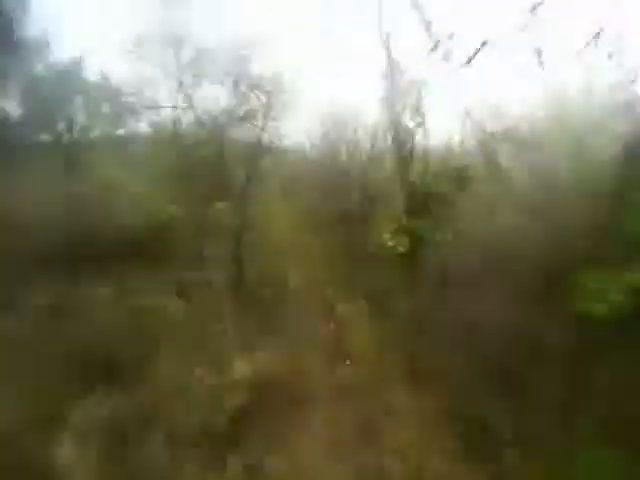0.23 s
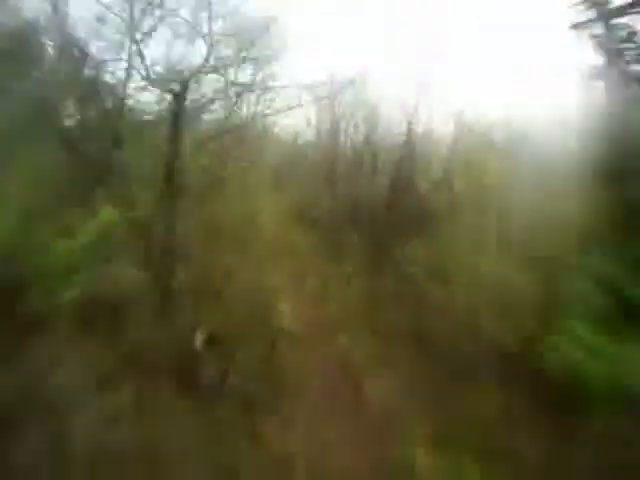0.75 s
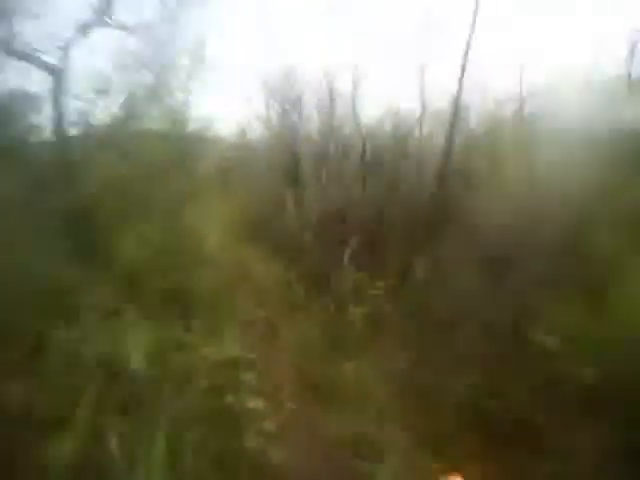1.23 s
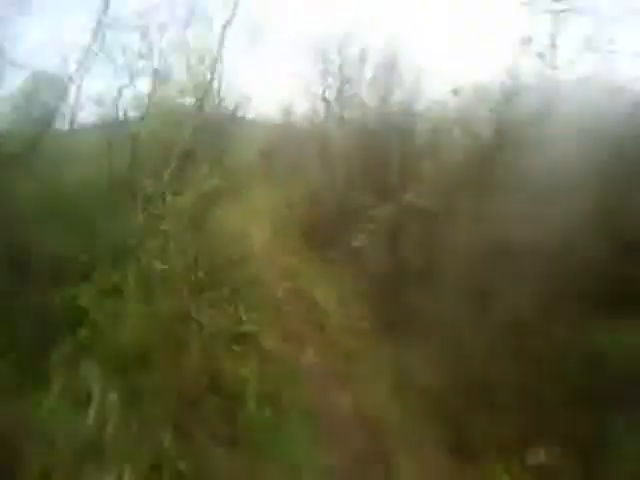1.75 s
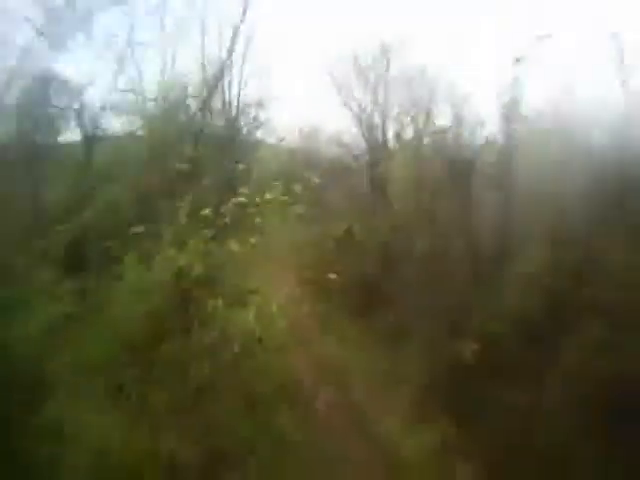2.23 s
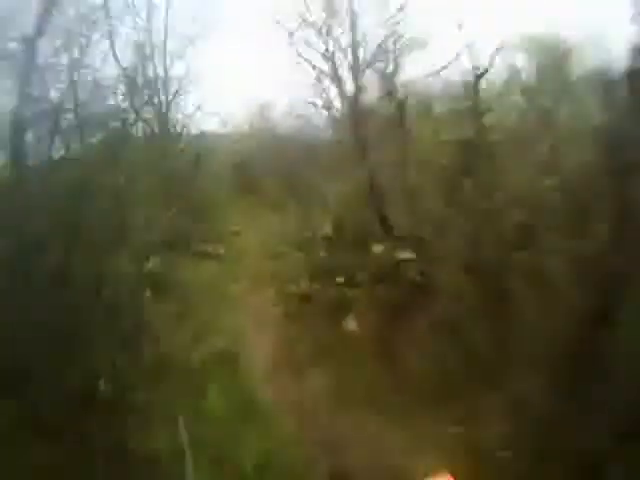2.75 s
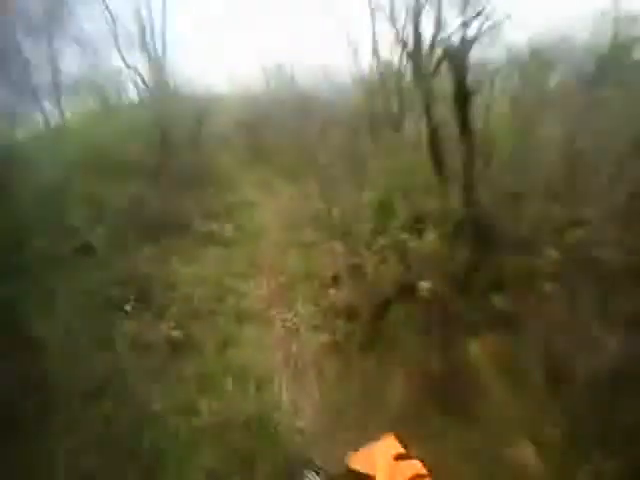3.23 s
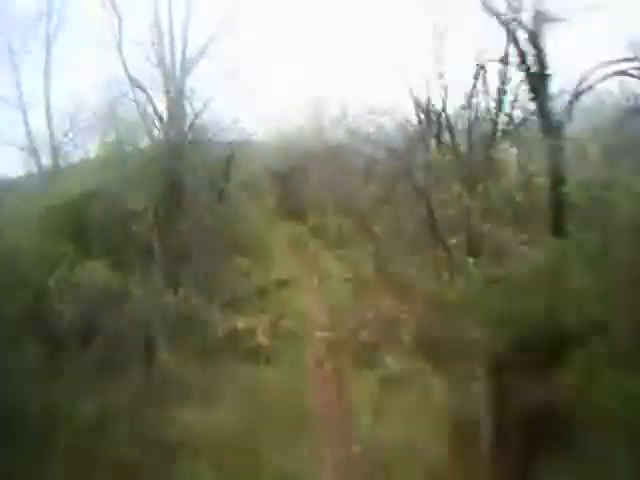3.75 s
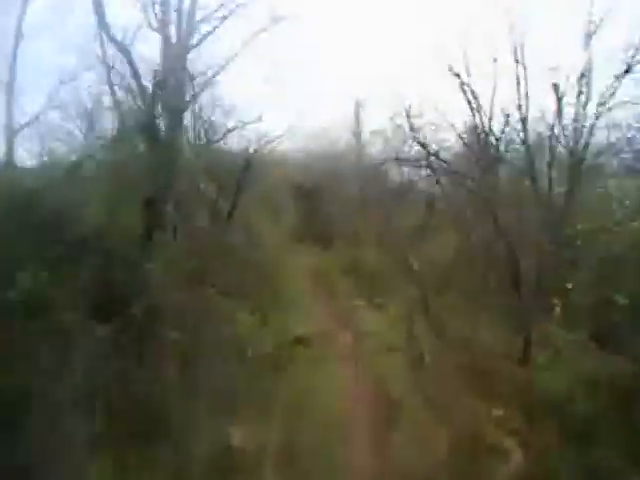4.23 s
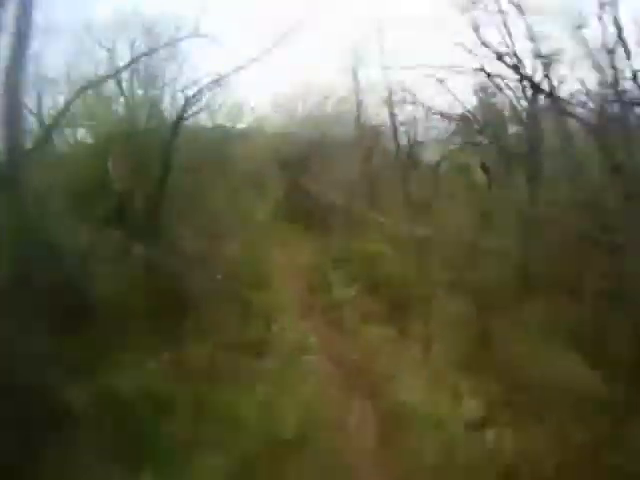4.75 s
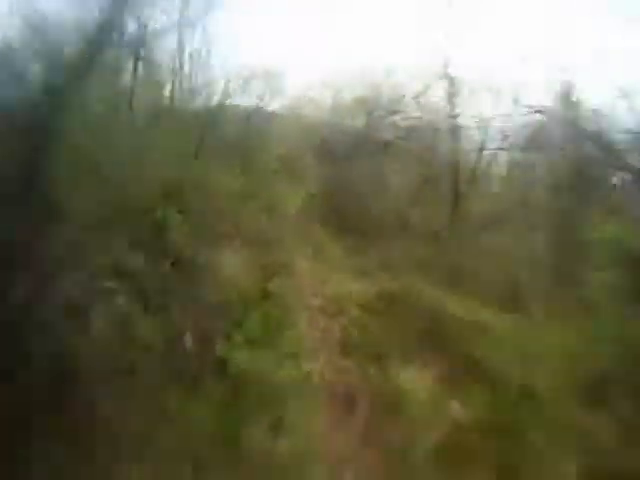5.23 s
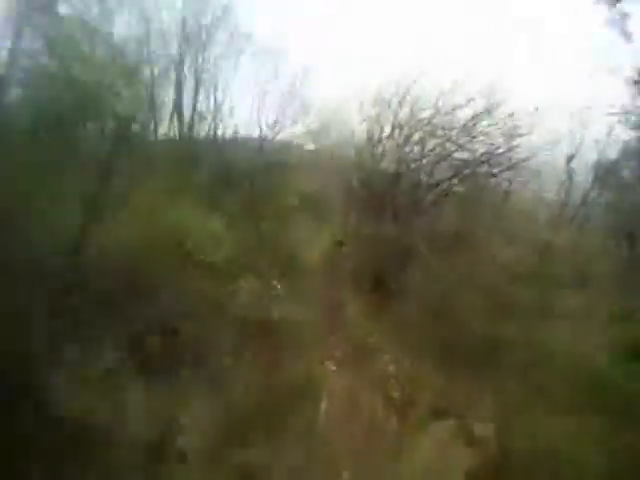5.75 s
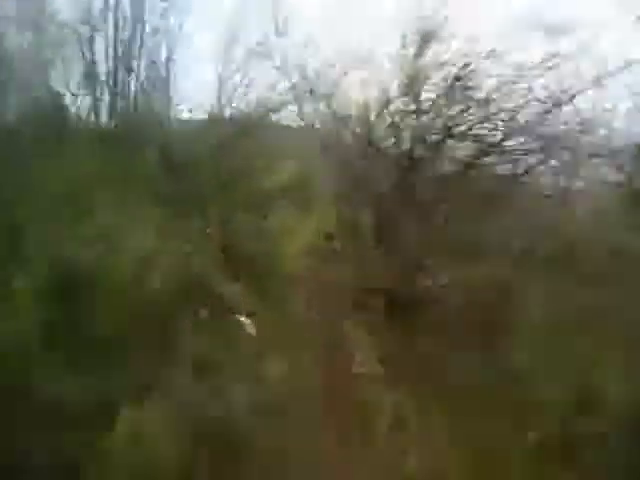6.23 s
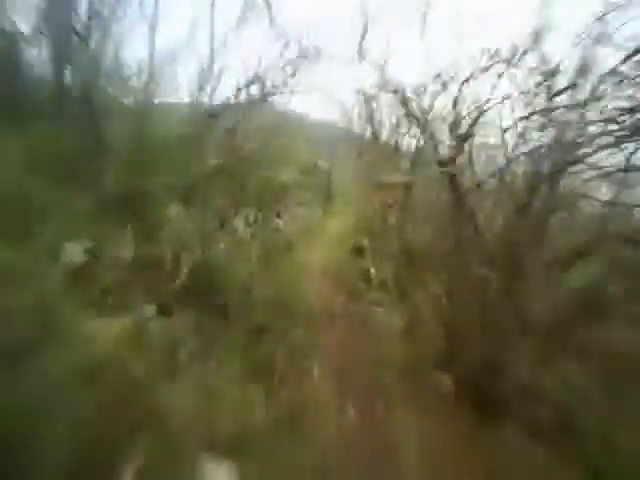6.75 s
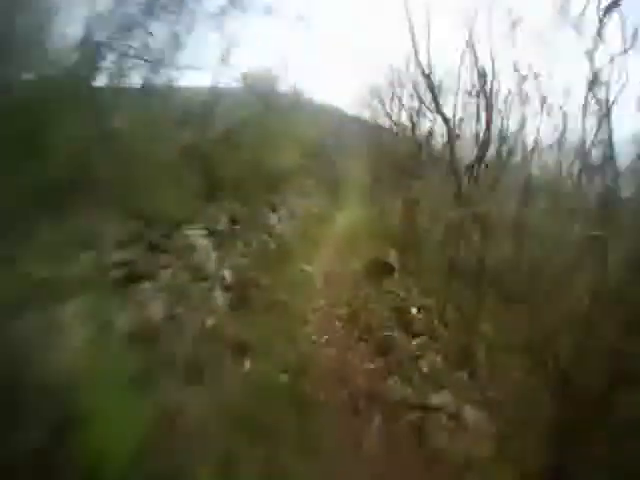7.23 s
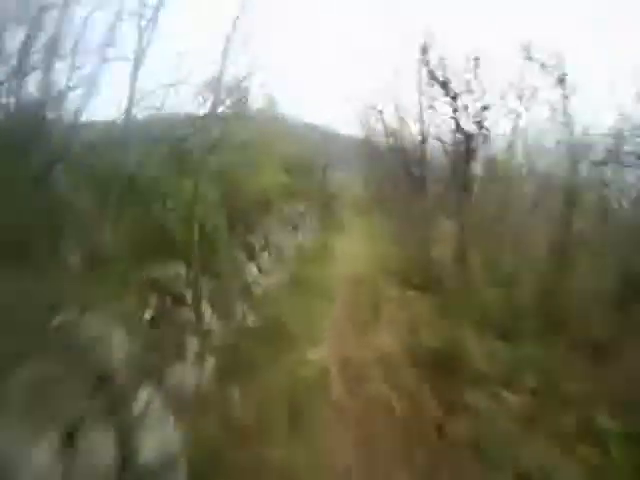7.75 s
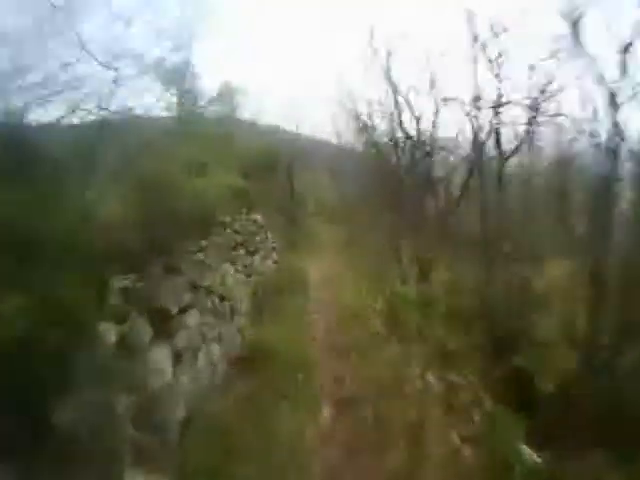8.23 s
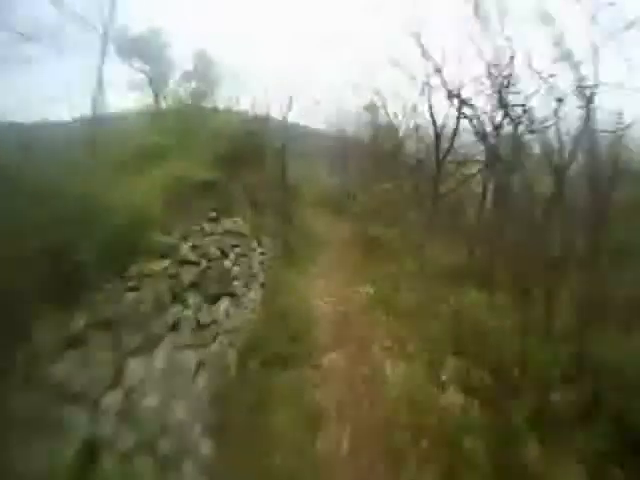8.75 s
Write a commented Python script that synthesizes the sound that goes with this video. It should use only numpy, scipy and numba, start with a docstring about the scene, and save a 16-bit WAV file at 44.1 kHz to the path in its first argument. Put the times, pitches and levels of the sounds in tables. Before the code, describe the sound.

Outdoor trail ride by bike, the microphone shut in a case on a springy mount, so everything is close, boxy and dull on top. Quiet throbbing rush and fine gravel crackle are interrupted by clusters of very loud, dry plastic clacks, metallic bracket knocks and low thumps. Small stones tick against the frame. Deep gusts buffet, and a soft ratchet buzz returns towards the end.

```python
"""Hard knocks, rattles and thuds of a mountain bike on a rocky trail, over wind, tyres and freewheel buzz.
We hear it from inside a closed case that rides along on a springy mount.
Blows are short noise chatter plus fading sines for the shell, bracket and mount.
Stones and wheel thuds are coloured noise bursts; wind is gusty noise over a steady rush whose lows pulse.
Tyres are random grains, the freewheel is a row of clicks, and a fast limiter flattens the worst blows."""
import sys
import numpy as np
from scipy import signal
from scipy.fft import rfft, irfft
from scipy.io import wavfile
from scipy.ndimage import uniform_filter1d, minimum_filter1d
from numba import njit

SR = 44100
rng = np.random.default_rng(int(sys.argv[2]) if len(sys.argv) > 2 else 0)


def master_out(mix):
    """Clip the mix to full scale and print it as 16-bit PCM to the path in sys.argv[1]."""
    frames = np.transpose(np.atleast_2d(mix))
    ceiling = np.clip(frames, -1, 1)
    pcm = np.round(ceiling * 32767).astype(np.int16)
    wavfile.write(sys.argv[1], SR, pcm)


N = 396459

# colour of the case chattering against its mount: [f/Hz, gain/dB]
CHATTER_COLOUR = [(100, -1.5), (300, 4.5), (480, 1), (780, 7), (1150, 2.5), (1650, 2), (2100, 3.5),
                  (2700, 4), (3300, -1), (4000, -6), (5000, -39.5)]
# patches of loose gravel: [middle t/s, half length/s, level/dB]
GRAVEL_PATCHES = [(1.35, .2, -55.5), (1.81, .07, -53.5), (2.9, 0.5, -57), (7.7, 1.2, -61.5)]


def knocks():
    """Big rocks slam the case against its mount: one blow for each row."""
    # hard blows: [t/s, chatter level/dB, chatter length/ms, shell level/dB,
    # pitch the contact favours f/Hz, bracket level/dB, mount thump level/dB]
    knock_rows = [ (1.396, -29, 3.8, -26.5, 1410, -26.5, -19.5), (2.578, 4, 4.6, -0.5, 2740, 5.5, -13),
                  (2.6, -8.5, 9.7, -7.5, 2850, -6.5, -20), (2.621, -10.5, 1.1, -34, 2700, -8.5, -10),
                  (2.7, -14, 1.2, -15, 3700, -20, -8.5), (2.712, -18, 6.5, -13, 3650, -15, -20),
                  (2.773, -43.5, 6.8, -32, 2360, -32, -31), (2.954, -22, 9.1, -6, 2466, -27.5, -21),
                  (3.119, -25.5, 6.9, -29.5, 1500, -16.5, -22), (3.16, -35, 6, -31.5, 2400, -42, -32),
                  (3.184, -36.5, 7.3, -24, 2500, -37, -36), (3.195, -12.5, 5, -25, 2400, -15.5, -25),
                  (3.221, -19.5, 3.1, -12.5, 3100, -36, -41), (5.019, -2.5, 3.23, -3.5, 2000, -33, -13),
                  (5.03, -8, 3.2, -2, 1750, -21, -23), (5.041, -10, 5.35, -5.5, 2750, -24, -20.5),
                  (6.569, -11, 4.2, -3.5, 2820, -11.5, -16), (6.578, 0.5, 8.4, -9.5, 1930, 3.5, -18),
                  (6.6, -18.5, 4.4, -11.5, 3000, -32, -17), (6.899, -29, 3, -31.5, 2500, -32, -16),
                  (6.961, 10, 0.39, -35.5, 1400, -27, -11.5), (7.217, -12.5, 7.1, -15.5, 1650, -29, -13),
                  (7.552, -5, 3.34, -4.5, 1530, -17, -15), (7.559, -15, 5.1, -25, 2750, -15.5, -4.5)]
    out = np.zeros(N)
    plastic = impulse_response(CHATTER_COLOUR)
    for start_s, chatter_db, length_ms, *rings in knock_rows:
        add(out, start_s, blow(plastic, length_ms / 1000, chatter_db, *rings))
    return out


def rattles(count=7, contact_share=0.63, jitter_s=.001, scatter_db=2):
    """After a jolt the case bounces at a nearly even pace, on the whole weaker each time."""
    # bounces: [t/s, time between bounces/ms, loss per bounce/dB, then for the first blow, before scatter:
    # chatter level/dB, shell level/dB, favoured pitch f/Hz, bracket level/dB, mount thump level/dB]
    rattle_rows = [(1.416, 11.6, 12, -36, -40, 2600, -45, -19.5),
                   (2.649, 17, 1.6, -19, -25, 2000, -18, -13), (3.131, 8, 6, -31.5, -25, 2400, -22.5, -33),
                   (3.202, 10.3, 2.5, -19, -20.5, 2790, -27.5, -15),
                   (6.875, 9.9, 1.2, -32.5, -37, 2554, -36, -29)]
    out = np.zeros(N)
    plastic = impulse_response(CHATTER_COLOUR)
    for start_s, gap_ms, loss_db, *first_blow in rattle_rows:
        gap_s = gap_ms / 1000
        contact_s = contact_share * gap_s  # the case scrapes its mount for part of each bounce
        for k, (late, strong) in enumerate(rng.standard_normal((count, 2))):
            gain = undb(scatter_db * strong - k * loss_db)
            bounce_s = start_s + k * gap_s + jitter_s * late
            add(out, bounce_s, gain * blow(plastic, contact_s, *first_blow))
    return out


def blow(plastic, length_s, chatter_db, shell_db, contact_hz, bracket_db, thump_db):
    """One blow chatters, rings shell and bracket, and sets the case bobbing on its mount."""
    # ringing tones of the plastic shell: [f/Hz, relative level/dB]
    shell_tones = [(1380, -5.5), (1655, 1.5), (1915, -5.5), (2340, 7.5), (2500, 11.5), (2715, -0.5),
                   (2980, 1.5), (3230, -11), (3650, -21.5), (3850, -22)]
    # ringing tones of the bracket: [f/Hz, relative level/dB, time to fade by 60 dB/s]
    bracket_tones = [(651, -22.5, 0.14), (822, -8, 0.086), (910.4, -0.5, 0.07), (1058, -19.5, 0.063)]
    # bobbing of the springy mount: [f/Hz, relative level/dB, time to fade by 60 dB/s]
    mount_tones = [(75.9, 1, 0.2), (111, -12.5, 0.055)]
    focus_octaves, shell_t60_s = .15, .019  # plastic damps its tones quickly
    t = np.arange(SR // 4) / SR
    # the point of contact decides which tones of the shell speak
    shell = []
    for hz, db in shell_tones:
        distance = np.log2(hz / contact_hz) / focus_octaves
        shell.append((hz, db - 10 * np.log10(1 + distance ** 2), shell_t60_s))
    scrape = chatter(t, length_s, plastic, steep=6.7)
    shell_ring = chatter(t, length_s, ring(shell, t, detune=0.0039), steep=5.9)
    bracket_ring = ring(bracket_tones, t, detune=0.024)
    thump = ring(mount_tones, t, detune=0.034)
    return (undb(chatter_db) * scrape + undb(shell_db) * shell_ring
            + undb(bracket_db) * bracket_ring + undb(thump_db) * thump)


def chatter(t, length_s, response, steep, rise_s=0.00045):
    """Hard surfaces buzz against each other for a few ms, sounding a body with the given response."""
    press = (1 - np.exp(-t / rise_s)) / np.sqrt(1 + (t / length_s) ** steep)
    rough = rng.standard_normal(len(t)) * press
    buzz = signal.fftconvolve(rough, response)[:len(t)]
    return buzz * np.sqrt(np.sum(press ** 2) / np.sum(buzz ** 2))  # as much energy as the pressing


def ring(modes, t, detune):
    """A struck part sounds as fading sines, a little out of tune from blow to blow."""
    total = np.zeros(len(t))
    for hz, db, t60 in modes:
        fade = np.exp(-np.log(1000) * t / t60)
        tuned_hz = hz * (1 + detune * rng.standard_normal())
        total += undb(db) * fade * np.sin(2 * np.pi * tuned_hz * t)
    return total


def wheel_thuds():
    """Wheels hit rocks with hollow thuds, made as low-coloured noise bursts."""
    # thuds: [t/s, level before a common gain/dB]
    thud_rows = [(1.4, -25), (2.6, -17.5), (2.665, -16), (2.7, -16), (3.103, -21), (3.196, -12), (6.9, -15),
                 (6.954, -16), (7.219, -17), (7.555, -20)]
    # hollow colour: [f/Hz, gain/dB]
    hollow_colour = [(60, -7.5), (150, 3.5), (250, -4), (340, -5), (450, -16), (900, -52)]
    return bursts(thud_rows, hollow_colour, length_s=0.0086, gain_db=0.5)


def flying_stones():
    """Larger stones and small pebbles hit the frame with short, bright noise bursts."""
    # larger stones: [t/s, level before a common gain/dB]
    stone_rows = [(0.7309, -32.5), (1.288, -33.5), (1.725, -36), (2.3492, -34), (6.7166, -21.5),
                  (6.7642, -34), (6.8224, -27), (6.875, -28), (7.1397, -19), (7.4552, -30), (7.9709, -28.5)]
    # colour of a stone's tick: [f/Hz, gain/dB]
    stone_colour = [(200, -12), (1100, -3.5), (1700, 7), (2100, 2.5), (2900, 8.5), (3600, -5.5),
                    (4800, -17.5), (5500, -50.5)]
    return bursts(stone_rows + pebbles(), stone_colour, length_s=0.0035, gain_db=-9)


def pebbles(mean_db=-45, scatter_db=3, count=12):
    """Small pebbles fly up at random, mostly from the gravel; levels are before the common gain."""
    looseness = np.cumsum(swells(GRAVEL_PATCHES) ** 2)
    # random heights on the running total fall most often where gravel is loosest
    times = np.searchsorted(looseness, rng.random(count) * looseness[-1]) / SR
    return list(zip(times, mean_db + scatter_db * rng.standard_normal(count)))


def bursts(rows, points, length_s, gain_db):
    """Each hit is one short chatter of the given colour, at the time and level of its row."""
    out, t = np.zeros(N), np.arange(SR // 8) / SR
    response = impulse_response(points)
    for start_s, db in rows:
        add(out, start_s, undb(db + gain_db) * chatter(t, length_s, response, steep=3.64))
    return out


def wind(buffet_db=2, rush_db=-47.0, unrest_db=2, breeze_db=-39.5):
    """Gusts buffet the case as deep noise, over a steady rush whose lows pulse."""
    # colour of the buffeting: [f/Hz, relative gain/dB]
    buffet_colour = [(11, 7.5), (22, 1), (40, -8.5), (85, -14), (150, -27), (300, -38), (1500, -82.5)]
    # colour of the rush: [f/Hz, relative gain/dB]
    rush_colour = [(30, -4.5), (90, 0), (140, -4.5), (250, -9), (500, -18.5), (1000, -24.5), (2000, -28),
                   (2700, -27), (3500, -30), (4000, -43.5), (4600, -44.5), (5300, -58.5)]
    # gusts: [middle t/s, half length/s, level before the buffet gain/dB]
    gust_rows = [(.9, 0.44, -38), (3.1, 0.17, -27.5), (4.59, 0.037, -27.5), (6.8, 0.16, -23.5),
                 (7.45, 0.24, -29.5), (8.04, .08, -24.5), (8.75, 0.38, -33.5)]
    buffet = unit(colour(rng.standard_normal(N), buffet_colour))
    buffet /= np.sqrt(uniform_filter1d(buffet ** 2, size=9000))  # even out its own slow changes
    rush = unit(colour(rng.standard_normal(N), rush_colour))
    unrest = undb(buffet_db + unrest_db * walk(27))
    gusts = swells(gust_rows, breeze_db)  # the breeze fills the time between gusts
    return unrest * buffet * gusts + undb(rush_db) * pulse_lows(rush)


def pulse_lows(x, pulse_hz=26.6, below_hz=600, depth_db=12, sharpness=7, uneven=0.31, slip=0.054):
    """The low part of the rush pulses quickly, nearly regularly."""
    low = signal.sosfiltfilt(signal.butter(2, below_hz, fs=SR, output="sos"), x)
    turns = pulse_hz * np.arange(N) / SR + slip * walk(20)
    pulse = np.exp(sharpness * (np.cos(2 * np.pi * turns) - 1))
    pulse_gain = unit(undb(depth_db * pulse * (1 + uneven * walk(pulse_hz))))
    return x - low + low * pulse_gain


def tyres(grains_per_s=900, spread_db=0.5, patchy_db=4.0, firm_ground_db=-65.5):
    """Grit cracks under the tyre knobs as random single-sample grains in uneven patches."""
    # colour of the cracking grit: [f/Hz, relative gain/dB]
    grit_colour = [(300, -0.5), (800, 3), (1100, 0.5), (1600, 2.5), (2000, 2.5), (2600, 7.5), (3200, -1.5),
                   (4000, -9.5), (5200, -42)]
    hits = rng.random(N) < grains_per_s / SR
    strength = undb(spread_db * np.minimum(rng.exponential(size=N), 5))
    grains = hits * rng.choice([-1, 1], N) * strength
    patches = undb(patchy_db * walk(32)) * swells(GRAVEL_PATCHES, firm_ground_db)
    return unit(colour(grains, grit_colour)) * patches


def freewheel(click_hz=291, wobble=0.054, fade_s=0.0013):
    """Pawls drop over the ratchet teeth: each click is a fading scrape of noise, coloured by the hub."""
    # colour of the hub: [f/Hz, relative gain/dB]
    hub_colour = [(550, -13.5), (800, 4.5), (1100, -11.5), (1650, 3), (2050, -7.5), (2380, 8.5), (2750, -1),
                  (3200, -15), (4200, -36)]
    # spells of coasting: [middle t/s, half length/s, level/dB]
    coast_rows = [(0.02, 0.25, -56.5), (7.8, 0.27, -59.5), (8.45, 0.32, -56)]
    teeth = np.floor(np.cumsum(click_hz * (1 + wobble * walk(9))) / SR)
    clicks = np.diff(teeth, prepend=0)  # 1 whenever another tooth passes
    fading = signal.lfilter([1], [1, -np.exp(-1 / (fade_s * SR))], clicks)
    scrape = fading * rng.standard_normal(N)
    return unit(colour(scrape, hub_colour)) * swells(coast_rows)


def swells(rows, rest_db=-np.inf):
    """Bell-shaped swells [middle t/s, half length/s, level/dB] add their power to a resting level."""
    t = np.arange(N) / SR
    power = undb(rest_db) ** 2 + np.zeros(N)
    for middle_s, half_s, db in rows:
        power += undb(db) ** 2 * np.exp(-((t - middle_s) / half_s) ** 2)
    return np.sqrt(power)


def walk(rate):
    """Random levels, about `rate` new ones a second, joined by straight ramps; rms 1."""
    k = int(SR / rate)
    steps = np.repeat(rng.standard_normal(N // k + 1), k)
    return unit(uniform_filter1d(steps, k)[:N])


def impulse_response(points, size=8192):
    """Sound of one click through a body whose colour is given as [f/Hz, gain/dB] points."""
    hz, db = np.transpose(points)
    grid_hz = np.fft.rfftfreq(size, 1 / SR) + 1  # the 1 avoids log(0)
    gain = undb(np.interp(np.log(grid_hz), np.log(hz), db))
    # folding the cepstrum (spectrum of the log gain) makes the response start at once
    cepstrum = irfft(np.log(gain))
    cepstrum[1:size // 2] *= 2
    cepstrum[size // 2 + 1:] = 0
    return irfft(np.exp(rfft(cepstrum)))


def colour(x, points):
    """Filter a sound to the colour of [f/Hz, gain/dB] points."""
    return signal.fftconvolve(x, impulse_response(points))[:len(x)]


def undb(db):
    """Turn decibels into gain."""
    return 10 ** (np.asarray(db) / 20)


def unit(x):
    """Scale to rms 1."""
    return x / np.sqrt(np.mean(x ** 2))


def add(track, start_s, sound):
    """Mix a sound into the track at its start time."""
    i = int(start_s * SR)
    track[i:i + len(sound)] += sound[:N - i]


@njit
def peak_follower(x, release):
    """Jumps to each peak and sinks back by the release factor every sample."""
    out, level = np.empty(len(x)), 0.
    for i in range(len(x)):
        level = max(abs(x[i]), level * release)
        out[i] = level
    return out


def scene(case_hz=4900):
    """All sources meet at one microphone; the closed case shuts out the treble."""
    hits = knocks() + rattles() + wheel_thuds() + flying_stones()
    mix = hits + wind() + tyres() + freewheel()
    return signal.sosfilt(signal.butter(20, case_hz, fs=SR, output="sos"), mix)[None]


def record(dry, ceiling=0.75, knee=0.81, release_s=.003, top_hz=10300):
    """Cuts the deepest rumble, limits the blows, rounds their tips and cuts the top treble."""
    x = signal.sosfilt(signal.butter(2, 6, "high", fs=SR, output="sos"), dry[0])
    peak = np.maximum(peak_follower(x, np.exp(-1 / (release_s * SR))), ceiling)
    # the gain starts to drop a few samples ahead of each peak
    gain = uniform_filter1d(minimum_filter1d(ceiling / peak, size=15), size=15)
    limited = x * gain
    rounded = limited / (1 + (limited / knee) ** 8) ** (1 / 8)
    return signal.sosfilt(signal.ellip(8, .2, 70, top_hz, fs=SR, output="sos"), rounded)[None]


dry = scene()
out = record(dry)
master_out(out)
```